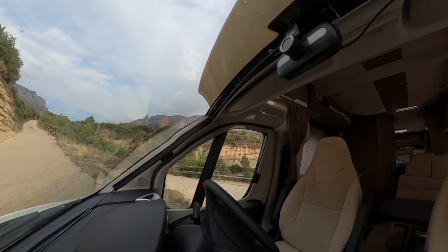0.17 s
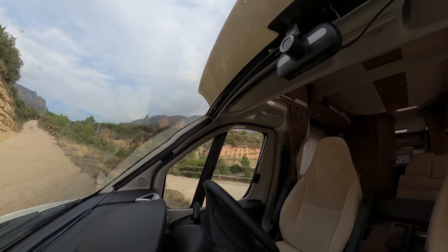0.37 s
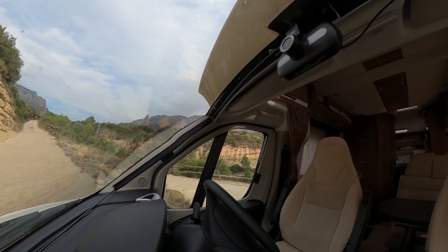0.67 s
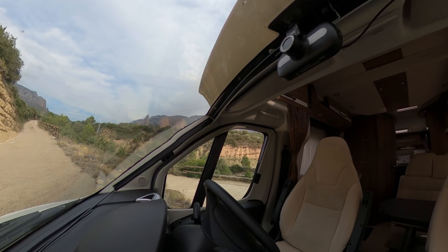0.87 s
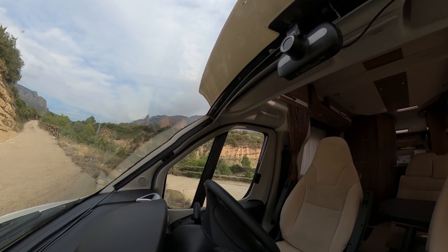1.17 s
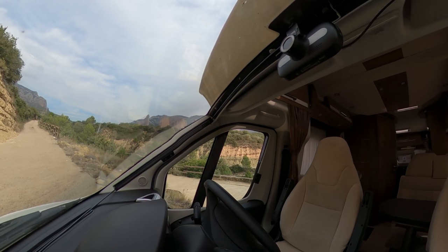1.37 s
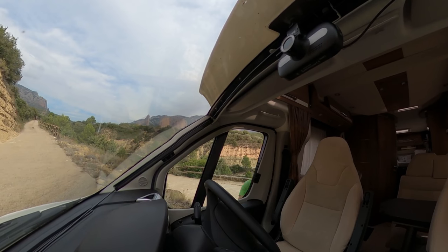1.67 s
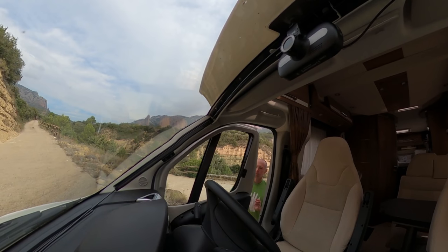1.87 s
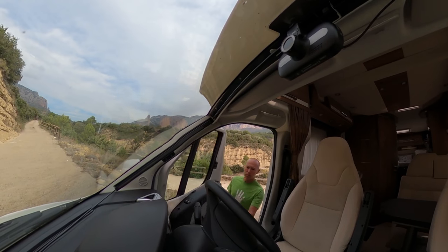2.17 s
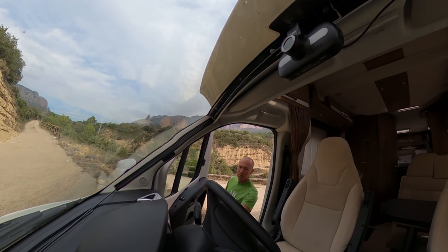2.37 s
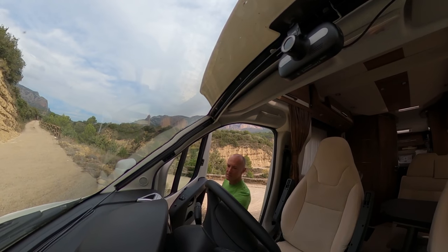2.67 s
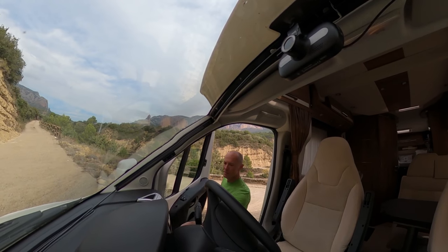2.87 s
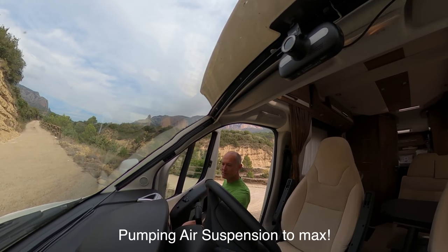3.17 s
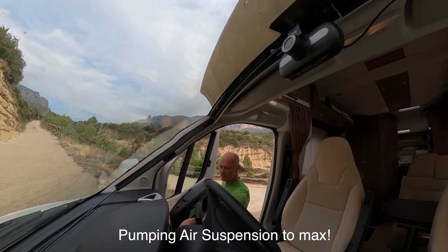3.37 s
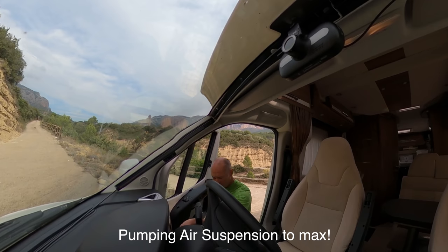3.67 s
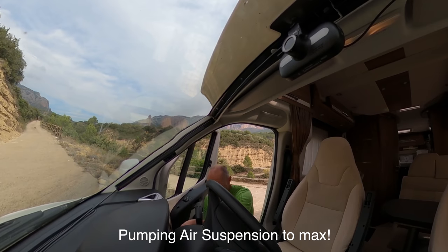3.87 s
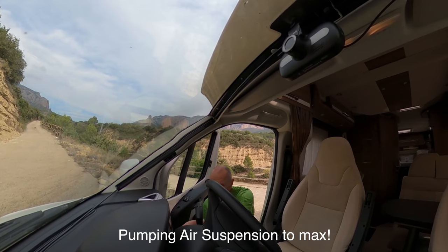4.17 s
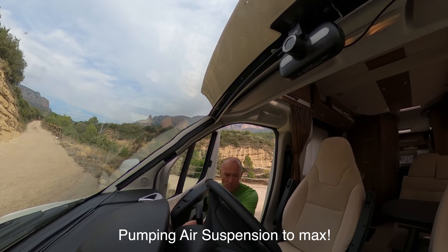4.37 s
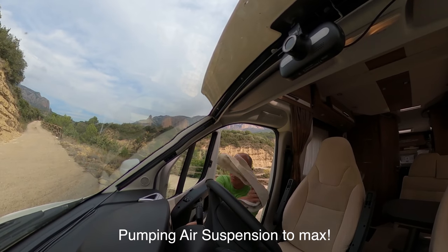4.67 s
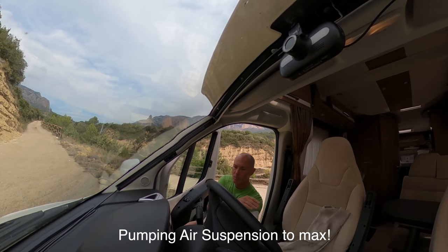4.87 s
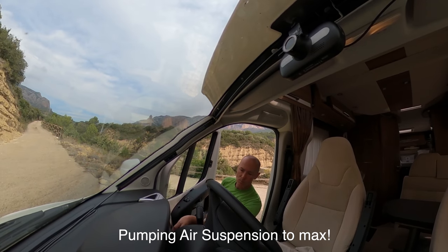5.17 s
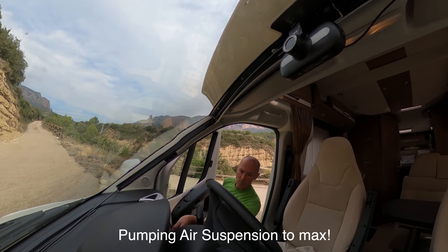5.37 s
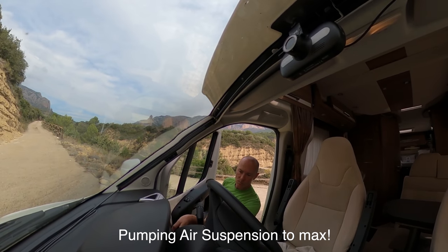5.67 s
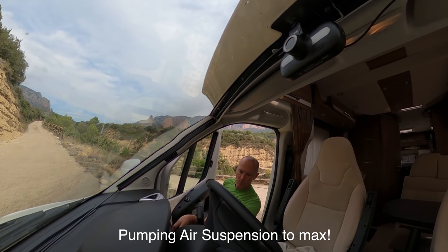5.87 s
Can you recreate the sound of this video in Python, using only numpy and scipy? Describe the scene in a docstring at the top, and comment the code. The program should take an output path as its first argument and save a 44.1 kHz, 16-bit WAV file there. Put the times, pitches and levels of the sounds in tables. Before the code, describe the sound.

Inside a parked van a diesel idles, the door clunks open with hard knocks, then a small air compressor lurches on and drones loudly.

```python
"""Van cab: diesel idle, door, air compressor

In the cab of a parked van a diesel idles: wavering firing orders under noise that throbs with the cycle.
The door is unlatched and swung open: knocks ring panel modes, the seal peels as noise, the boom falls away.
A valve spits noise, a small piston compressor lurches up to speed, and a second spit follows.
It drones on as tank pressure builds: stroke harmonics, whine, hiss and struck housing resonances.
"""
import sys
import numpy as np
from scipy import signal
from scipy.fft import rfft, irfft
from scipy.io import wavfile
from scipy.ndimage import uniform_filter1d, map_coordinates

SR = 44100
rng = np.random.default_rng(int(sys.argv[2]) if len(sys.argv) > 2 else 0)


def volts(x):
    """Linear amplitude factor 10**(x/20) for a level x in dB, scalar or array-like."""
    e = np.asarray(x, float) / 20
    return 10 ** e


def wrap_up_sound(samples):
    """Save the sound to the file named by the first command line argument, as 16-bit audio."""
    columns = np.atleast_2d(samples).T
    # keep every value between -1 and 1, then stretch to whole-number steps
    tamed = np.clip(columns, -1, 1)
    steps = np.round(tamed * 32767).astype(np.int16)
    wavfile.write(sys.argv[1], SR, steps)


N = 265041
T = np.arange(N) / SR


def evened(x):
    """Scales to rms 1."""
    return x / np.sqrt(np.mean(x ** 2) + 1e-20)


def curves(rows):
    """Interpolates each column over the time in the first."""
    s, *columns = np.transpose(rows)
    return [np.interp(T, s, column) for column in columns]


def ramp(start_s, takes_s):
    """Goes from 0 to 1."""
    return np.clip((T - start_s) / takes_s, 0, 1)


def colour_of(points, hz):
    """Reads a spectrum in dB over log frequency, -120 dB outside its ends."""
    f, db = np.transpose(points)
    return np.interp(np.log(hz + 1), np.log(f + 1), db, left=-120, right=-120)


def tilted(points, tilt_db, about_hz):
    """Leans a spectrum by tilt_db an octave."""
    return [(hz, db + tilt_db * np.log2(hz / about_hz)) for hz, db in points]


def coloured(points, patchy_db=0., size=N):
    """Noise with the given spectrum and drifting patches, rms 1."""
    hz = np.fft.rfftfreq(2048, 1 / SR)
    real, imag, patches = rng.standard_normal((size // 512 + 6, 1025, 3)).T
    patches = uniform_filter1d(patches, size=12, axis=0)
    patches = evened(uniform_filter1d(patches, size=5, axis=1))
    z = (real + 1j * imag) * volts(colour_of(points, hz)[:, None] + patchy_db * patches)
    noise = signal.istft(z, nperseg=2048, noverlap=1536)[1]
    return evened(noise[1024:1024 + size])


def waver(rate_hz):
    """Smooth random drift through rate_hz knots a second, rms near 1."""
    knots = rng.standard_normal(300)
    steps = np.arange(0, N + 64, 64) / SR * rate_hz
    return np.repeat(map_coordinates(knots, [steps + 3], order=3), 64)[:N]


def strokes(turns, sharp, at=0.):
    """A smooth bump once per turn, mean power 1."""
    return evened(np.exp(sharp * np.cos(2 * np.pi * (turns - at))))


def burst(row, colour, flutter_db):
    """Noise with attack, hold and release, all linear in dB."""
    edge_db = 30  # depth of attack and release
    start_s, attack_s, hold_s, release_s, db, tilt_db = row
    shape = ramp(start_s, attack_s) - ramp(start_s + attack_s + hold_s, release_s)
    level_db = db - edge_db * (1 - shape) + flutter_db * waver(29.93)
    return (shape > 0) * volts(level_db) * coloured(tilted(colour, tilt_db, 1000))


# compressor speed: (time [s], stroke rate [Hz])
SPEED = [(2.89, 64), (3.01, 66.3), (3.05, 68.5), (3.1, 72.15), (3.5, 72.65), (4.4, 72.93), (5.0, 73.02),
         (6.02, 73.18)]
# compressor levels before flutter: (time [s], drone level [dB], hiss level [dB])
PUMP_LEVEL = [(2.895, -33, -35), (2.906, -23.5, -28.5), (2.93, -14.5, -29), (2.946, -17, -27),
              (2.953, -10, -31), (2.97, -11, -30.5), (3.005, -11, -32), (3.045, -18, -33), (3.12, -21, -32),
              (3.5, -17.5, -32), (3.75, -16, -28.5), (4.1, -18, -29.5), (4.5, -16, -29), (6.02, -19.5, -32)]
# strong and weak strokes take turns: (start [s], fade in [s], end [s], fade out [s], depth [dB])
ALTERNATE = (3.656, 0.051, 4.14, .08, 6.4)
CATCH_S, CATCH_TAKES_S, SLIP = 2.995, 0.052, 0.23  # motor stops lurching; share of steady running before
LIGHT_LOAD, LOAD_STEP, LOAD_PER_S = 0.069, 0.73, 0.21  # load steps up, then creeps to 1
LOAD_S, LOAD_TAKES_S = 3.67, 0.025
SETTLES_S, SETTLING_TAKES_S = 4.6, 1.055


def compressor():
    """Speed and load of the piston pump drive its drone, whine, hiss, housing and shudder."""
    drone_db, hiss_db = curves(PUMP_LEVEL)
    turns = np.cumsum(curves(SPEED)[0]) / SR + 0.0014 * waver(20)
    caught = ramp(CATCH_S, CATCH_TAKES_S)
    running = np.clip(SLIP + (1 - SLIP) * caught, 0, 1)
    load_rise = LOAD_STEP * ramp(LOAD_S, LOAD_TAKES_S) + LOAD_PER_S * np.maximum(T - LOAD_S, 0)
    loaded = np.clip(LIGHT_LOAD * caught + load_rise, 0, 1)
    settling = ramp(SETTLES_S, SETTLING_TAKES_S)
    start_s, fade_in_s, end_s, fade_out_s, turn_db = ALTERNATE
    alternating = ramp(start_s, fade_in_s) - ramp(end_s, fade_out_s)
    uneven_db = turn_db * alternating * (np.cos(np.pi * turns) - 0.7)
    out = drone(turns, drone_db, running, loaded, settling, uneven_db)
    out += whine(turns)
    out += air_hiss(turns, hiss_db, loaded)
    out += volts(hiss_db - hiss_db[-1]) * (housing(turns, loaded, uneven_db) + volts(-48) * rattle(turns))
    out += (1 - caught) * shudder(turns, drone_db)
    return out * ramp(PUMP_LEVEL[0][0], 0.0072)


# drone balance, scaled to total 0 dB in each state:
# (multiple of stroke rate, lurching [dB], light [dB], loaded [dB], settled [dB])
ORDERS = [(1, -18, -19, -10.5, -10.5), (2, -11.5, 0, 0, 0), (3, 2, -1.5, -1, -2), (4, -8.5, -7.5, -9, -7.5),
          (5, -9, -13, -10, -10), (6, -21, -22.5, -24.5, -44), (7, -22, -24.5, -27, -27.5),
          (8, -3.5, -19, -16.5, -24.5), (9, -13, -20, -12, -12.5), (10, -13, -20.5, -3.5, -1.5),
          (11, 2, -30, -22.5, -24.5), (12, -12, -29, -33, -29), (13, -8, -47, -32, -29.5),
          (14, -10, -40, -29, -23), (15, -27, -18, -18.5, -17), (16, -23, -30, -26, -30),
          (17, -32, -44, -43, -24), (18, -29, -44, -32, -18.5), (19, -17.5, -18, -15, -15),
          (20, -29.5, -18, -19.5, -18.5), (21, -28, -23, -23, -20.5), (22, -40, -28, -20, -21.5),
          (23, -36, -24, -36, -43), (24, -31, -28, -24, -30)]
# phase slip of the high orders: (until settling [turns], settled [turns])
CHATTER_SPREAD = (.05, .11)


def drone(turns, drone_db, running, loaded, settling, uneven_db):
    """Stroke-rate harmonics; the high ones line up into a chatter pulse that blurs as the pump settles."""
    state = running + loaded + settling  # 0 lurching, 1 light, 2 loaded, 3 settled
    orders_db = np.array(ORDERS)[:, 1:]
    total_db = 10 * np.log10((volts(orders_db) ** 2).sum(axis=0))
    spread = np.interp(settling, (0, 1), CHATTER_SPREAD)
    out = np.zeros(N)
    for k, db in enumerate(orders_db - total_db, 1):
        flutter_db = (0.5 + 0.018 * k + 0.64 * (k in (3, 4))) * waver(14)
        flutter_db += 3 * (1 - running) * waver(28.3)
        level_db = drone_db + np.interp(state, np.arange(len(db)), db) + flutter_db
        level_db += (15 <= k <= 22) * uneven_db
        # low orders spread over the whole turn
        phase = 0.06 * rng.random() + (k * k / 6 if k < 14 else spread * (k - 21) ** 2)
        out += np.sqrt(2) * volts(level_db) * np.cos(2 * np.pi * (k * turns + phase))
    return out


# valve reed and commutator lines, before flutter:
# (multiple of stroke rate, rounded when played, early [dB], midway [dB], late [dB])
WHINE = [(29, -64, -49, -50), (34, -56, -53.5, -54), (39, -53, -56, -54.5), (51, -59, -59, -62),
         (55, -54, -53, -63), (61, -47, -47.5, -52), (68.6, -60, -61, -52.5), (72.2, -57, -50, -54.5),
         (74, -56, -52, -57), (81, -62, -64, -57.5), (118, -59, -59, -68)]
# times of those levels: (early [s], midway [s], late [s])
WHINE_S = (3.4, 4.3, 5.4)


def whine(turns):
    """Thin reed and commutator tones, each swelling or fading as the pressure builds."""
    out = np.zeros(N)
    for k, *db in WHINE:
        level_db = np.interp(T, WHINE_S, db) + 1.4 * waver(9)
        out += np.sqrt(2) * volts(level_db) * np.sin(2 * np.pi * (round(k) * turns + rng.random()))
    return ramp(3.08, 0.086) * out


# air spectrum under light load: (frequency [Hz], relative density [dB per Hz])
HISS_LIGHT = [(150, -45), (250, -17), (364, 1), (411, -2), (748, -13), (900, -19), (1070, -8), (1250, -6.5),
              (1410, -5), (2130, -20.5), (4440, -17.5), (4760, -23), (5190, -21), (8970, -31.5),
              (15000, -60)]
# air spectrum under load, also colours the rattle: (frequency [Hz], relative density [dB per Hz])
HISS_LOADED = [(150, -25), (250, -6), (371, -11), (488, -13), (736, -8.5), (873, -16.5), (1430, -16),
               (2240, -28.5), (4080, -31), (4440, -24.5), (4760, -34.5), (5190, -28), (7560, -40.5),
               (8970, -37), (11500, -54.5), (15000, -68)]


def air_hiss(turns, hiss_db, loaded):
    """Air noise puffing once a stroke, its colour crossfading with load."""
    light = np.sqrt(1 - loaded) * coloured(HISS_LIGHT, patchy_db=2.5)
    full = np.sqrt(loaded) * coloured(HISS_LOADED, patchy_db=1.0)
    return volts(hiss_db) * (light + full) * strokes(turns, sharp=0.19)


def rattle(turns):
    """The same rough scrape returns every stroke, filling the treble with thin lines."""
    one_turn = rng.standard_normal(600) * (1.3 + np.exp(-np.arange(600) / 120))
    scrape = np.interp(turns % 1 * 600, np.arange(600), one_turn)
    hz = np.fft.rfftfreq(N, 1 / SR)
    return evened(irfft(rfft(scrape) * volts(colour_of(HISS_LOADED, hz)) * (hz > 1900), N))


def ring(x, hz, width_hz):
    """Two-pole resonance applied twice for steep skirts, rms 1."""
    r = np.exp(-np.pi * width_hz / SR)
    poles = [1, -2 * r * np.cos(2 * np.pi * hz / SR), r * r]
    once = signal.lfilter([1, 0, -1], poles, x)
    return evened(signal.lfilter([1], poles, once))


# housing resonances, levels at the final hiss level:
# (frequency [Hz], width [Hz], light [dB], loaded [dB], share of the stroke alternation [ratio])
HOUSING = [(759, 30, -36.5, -43.5, 0.49), (1541, 180, -36, -39.5, 1), (1815, 150, -39.5, -50, -1.1),
           (3640, 240, -44.5, -56, -0.66), (4450, 62, -55, -73, 0.12), (5110, 440, -53, -52, 0.47),
           (6290, 240, -52.5, -67, 0), (8840, 750, -58.5, -61, -0.33), (11500, 1900, -71, -75.5, 0)]


def housing(turns, loaded, uneven_db):
    """Valve slap strikes the housing: a click and rough burst each stroke, a weaker burst later in the turn."""
    click = evened(np.diff(np.floor(turns), prepend=0)) * volts(1.0 * waver(30))
    rough = strokes(turns, sharp=1.5) + 0.35 * strokes(turns, sharp=1.5, at=0.27)
    slap = 1.9 * click + rough * rng.standard_normal(N)
    out = np.zeros(N)
    for hz, width_hz, light_db, full_db, share in HOUSING:
        level_db = light_db + loaded * (full_db - light_db) + share * uneven_db
        out += volts(level_db) * ring(slap, hz, width_hz)
    return out


# mount shudder spectrum: (frequency [Hz], relative density [dB per Hz])
SHUDDER_COLOUR = [(88, -45), (150, -14), (197, -6.5), (302, -13.5), (387, -9.5), (718, -14.5), (791, -17),
                  (1330, -24.5), (4000, -46.5), (5200, -82), (8800, -120)]


def shudder(turns, drone_db):
    """Rough noise of the mounts, 4 dB under the drone, pulsing each stroke."""
    level = volts(drone_db - 4 + 1.2 * waver(28.9))
    return level * coloured(SHUDDER_COLOUR) * strokes(turns, sharp=0.87)


# valve air: (start [s], attack [s], hold [s], release [s], level [dB], tilt about 1 kHz [dB per octave])
SPITS = [(2.864, 0.015, 0.0028, 0.039, -22.5, 0.71), (3.309, 0.061, 0.018, .036, -18.5, 0)]
# air jet spectrum: (frequency [Hz], relative density [dB per Hz])
JET = [(1060, -31), (1800, -8.5), (3290, -14.5), (3600, -3), (4260, -5), (5040, -1.5), (7120, -8.5),
       (8130, -7), (9370, -10), (10300, -21), (15000, -40)]


def valve():
    """Valve air as short fluttering noise bursts."""
    return sum(burst(row, JET, flutter_db=3.0) for row in SPITS)


# knocks on the cab panels from latch, trim and jolts of the lurching pump: (time [s], thud level [dB],
# panel pitch [ratio], hardness about 200 Hz [dB per octave], crack level [dB], crack tilt about 1 kHz
# [dB per octave])
KNOCKS = [(1.343, -17, 1.07, -3, -59, 0), (1.5, -16, 0.58, -6, -53, 2), (1.595, -15.5, 1.04, -13, -19.5, 2),
          (1.621, -14, 1.05, -3.5, -26, -1.5), (1.689, -10.5, 1, 2.5, -14, 2.5),
          (1.701, -13.5, 1, 6.5, -18, -3), (1.734, -19, 1.1, 1, -29, -11),
          (1.755, -15.5, 1.1, -6.5, -27.5, -2.5), (2.075, -16.5, 1, 1.5, -18, 0),
          (2.092, -11, 0.95, 4.5, -33, -4), (2.95, -13, 1, 4.5, -17.5, -4), (2.966, -19, 1.01, 6, -19, -2),
          (2.985, -23, 1.01, 10.5, -11, -9)]
# panel modes before each knock's scaling: (frequency [Hz], level [dB], t60 [s])
PANEL = [(126.8, -1, 0.28), (161.4, -1, 0.43), (205.3, 1, 0.2), (277, 0, 0.19), (340, 1, 0.12),
         (417.4, 0.5, 0.14), (528, -9, 0.14), (765, -12, 0.058), (1324, -19.5, 0.027)]
# crack spectrum before tilt: (frequency [Hz], relative density [dB per Hz])
CRACK = [(290, -33), (500, -6), (838, -9.5), (1290, -4), (1860, -13), (2900, -18.5), (3940, -22.5),
         (8960, -43), (14000, -73)]
RING_SHARE, RING_PER_DB = 0.72, 0.0264  # panel t60 factor; harder knocks ring longer
CRACK_T60_S, LONGER_PER_DB = 0.1, 0.0121  # at -21 dB; louder cracks last longer


def door():
    """Each knock rings the panel modes after a soft push and sprays a short noise crack."""
    out, t = np.zeros(N + SR), T[:SR // 2]
    for s, thud_db, pitch, hard_db, crack_db, tilt_db in KNOCKS:
        lasts = RING_SHARE * np.exp(RING_PER_DB * hard_db)
        crack_t60_s = CRACK_T60_S * np.exp(LONGER_PER_DB * (crack_db + 21))
        thud = np.zeros(len(t))
        for hz, db, t60_s in PANEL:
            level_spread, pitch_spread = rng.standard_normal(2)
            mode_db = db + hard_db * np.log2(hz / 200) + 1.56 * level_spread - 60 * t / (t60_s * lasts)
            tone = np.sin(2 * np.pi * hz * pitch * (1 + 0.028 * pitch_spread) * t)
            thud += volts(mode_db) * tone * (1 - np.exp(-t * hz / 0.99))
        crack = coloured(tilted(CRACK, tilt_db, 1000), patchy_db=2.5, size=len(t))
        crack *= volts(-60 * t / crack_t60_s) * (1 - np.exp(-t / 0.0028))
        out[round(s * SR):][:len(t)] += volts(thud_db) * thud + volts(crack_db) * crack
    return out[:N]


# seal peel: (start [s], attack [s], hold [s], release [s], level [dB], tilt about 1 kHz [dB per octave])
SEAL = (1.921, .011, .077, .013, -39, 0)
# seal spectrum: (frequency [Hz], relative density [dB per Hz])
SEAL_COLOUR = [(470, -44), (800, -16), (1200, 0.5), (1370, -8), (1730, -15), (5610, -17), (13000, -44.5)]


def seal():
    """The rubber door seal peels as one noise burst."""
    return burst(SEAL, SEAL_COLOUR, flutter_db=-0.5)


# small hard plastic ticks near the dashboard:
# (time [s], level [dB], t60 [s], tilt about 1 kHz [dB per octave])
TICKS = [(1.206, -32, 0.071, -2), (4.11, -21.5, 0.1, 1.8), (4.877, -22.5, 0.047, 0)]
# tick spectrum before tilt: (frequency [Hz], relative density [dB per Hz])
TICK_COLOUR = [(940, -27), (1600, 1.5), (2700, -7.5), (3560, -5), (4440, -13.5), (5760, -11.5),
               (12000, -40), (15600, -67), (22000, -120)]


def ticks():
    """Bright decaying snaps of noise."""
    out, t = np.zeros(N + SR), T[:SR // 4]
    for s, db, t60_s, tilt_db in TICKS:
        snap = coloured(tilted(TICK_COLOUR, tilt_db, 1000), size=len(t))
        out[round(s * SR):][:len(t)] += snap * volts(db - 60 * t / t60_s) * (1 - np.exp(-t / 0.0031))
    return out[:N]


# dull bumps through door and seat: (time [s], frequency [Hz], level [dB], t60 [s])
BUMPS = [(1.709, 176, 2, 0.046), (1.8, 151.5, -13, 0.24), (4.11, 190, -15, 0.27), (4.87, 193, -20, 0.23),
         (4.96, 178, -12.5, 0.24)]


def bumps():
    """Decaying low sines that swell in softly."""
    out, t = np.zeros(N + SR), T[:SR // 2]
    for s, hz, db, t60_s in BUMPS:
        push = volts(db - 60 * t / t60_s) * (1 - np.exp(-t / (0.034 * t60_s)))
        out[round(s * SR):][:len(t)] += push * np.sin(2 * np.pi * hz * t)
    return out[:N]


# idle speed in four-stroke cycles, four firings each, sagging under electrical load:
# (time [s], cycle rate [Hz])
CYCLE = [(0, 6.94), (1.7, 6.53), (2.0, 6.95), (2.9, 6.65), (3.1, 6.7), (6.02, 6.06)]
# idle lines before level curve and flutter: (multiple of cycle rate, door shut [dB], door open [dB])
IDLE = [(4, -46, -42.5), (8, -31, -34.5), (12, -36, -39.5), (16, -40.5, -40), (20, -35.5, -39.5),
        (31, -27, -36), (36, -37.5, -43.5), (40, -32, -43), (49, -40, -38.5)]
# low cab noise spectrum: (frequency [Hz], relative density [dB per Hz])
BOOM = [(12, -43), (20, -10), (59, -9), (103, -13), (138, -4.5), (161, -7), (207, -0.5), (274, -5),
        (353, -9), (700, -21.5), (910, -54.5), (1540, -120)]
# mid engine noise spectrum: (frequency [Hz], relative density [dB per Hz])
CLATTER = [(240, -39), (400, -1), (620, -2), (665, 2), (925, -4.5), (1180, -6), (1600, -9), (1900, -21),
           (2600, -22.5), (3380, -52), (5720, -120)]
# high engine noise spectrum: (frequency [Hz], relative density [dB per Hz])
TREBLE = [(1060, -43), (1800, -0.5), (2090, -3), (2780, -4), (3500, -3.5), (4730, -11), (5410, -10.5),
          (9890, -27), (15000, -76.5)]
# cab noise before level curve, door shut: (boom [dB], clatter [dB], treble [dB])
SHUT_DB = (-25.5, -36, -54.5)
# cab noise before level curve, door open: (boom [dB], clatter [dB], treble [dB])
OPEN_DB = (-30.5, -34.5, -47.5)
# preset level curve over the engine: boom jumps, then dips briefly just after the loud door knocks;
# treble dips there too and recovers slowly: (time [s], boom [dB], treble [dB])
ENGINE_LEVEL = [(0, -1.5, -0.5), (.5, 0.7, 1), (.78, 0, 1.5), (.9, 1, 3.5), (1.15, -0.5, 3.5),
                (1.45, -1, 1.5), (1.62, -2, 5), (1.7, 7.5, -1), (1.83, -8.5, -3), (2.0, 0, -1),
                (2.36, -4, 0), (2.64, -1.5, 1), (2.9, -1, 2)]
DOOR_OPENS_S, DOOR_SWING_S = 1.585, 0.35
CLATTER_SHARE = 0.75  # of the boom level curve


def engine():
    """Firing orders as wavering tones, under throbbing boom and clatter and flickering treble."""
    turns = np.cumsum(curves(CYCLE)[0]) / SR + 0.0065 * waver(1.5)
    opened = ramp(DOOR_OPENS_S, DOOR_SWING_S)
    boom_curve_db, treble_curve_db = curves(ENGINE_LEVEL)
    curves_db = (boom_curve_db, CLATTER_SHARE * boom_curve_db, treble_curve_db)
    boom_db, clatter_db, treble_db = (shut + opened * (wide - shut) + curve
                                      for shut, wide, curve in zip(SHUT_DB, OPEN_DB, curves_db))
    out = np.zeros(N)
    for k, shut_db, open_db in IDLE:
        level_db = shut_db + opened * (open_db - shut_db + 0.85 * boom_curve_db)
        level_db += (0.33 + 0.047 * k) * waver(9)  # high orders flutter more
        out += np.sqrt(2) * volts(level_db) * np.sin(2 * np.pi * (round(k) * turns + rng.random()))
    throb = strokes(turns, sharp=0.073) * strokes(4 * turns, sharp=0.17)
    out += volts(boom_db) * coloured(BOOM, patchy_db=1) * throb
    out += volts(clatter_db) * coloured(CLATTER, patchy_db=1.5) * strokes(4 * turns, sharp=0.087)
    out += volts(treble_db) * coloured(TREBLE, patchy_db=2.5) * volts(0.31 * waver(25))
    return out


def scene():
    """Everything reaches one microphone."""
    return (compressor() + valve() + door() + seal() + ticks() + bumps() + engine())[None]


def roll_off(x):
    """The treble ends steeply here."""
    return signal.sosfilt(signal.butter(12, 15600, fs=SR, output="sos"), x)


def record(dry):
    """Loud peaks round off softly."""
    mix = 1.081 * np.tanh(dry / 1.126)
    return roll_off(mix)


dry = scene()
out = record(dry)
wrap_up_sound(out)
```